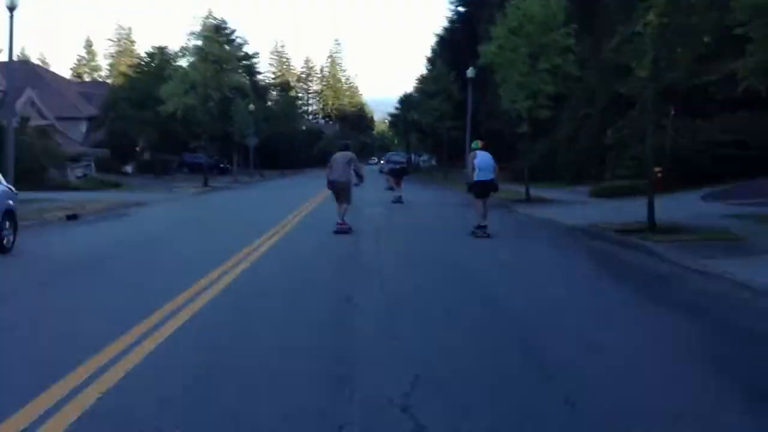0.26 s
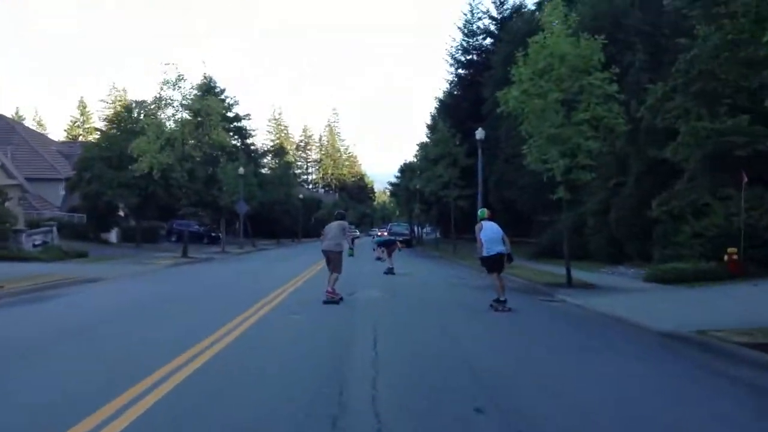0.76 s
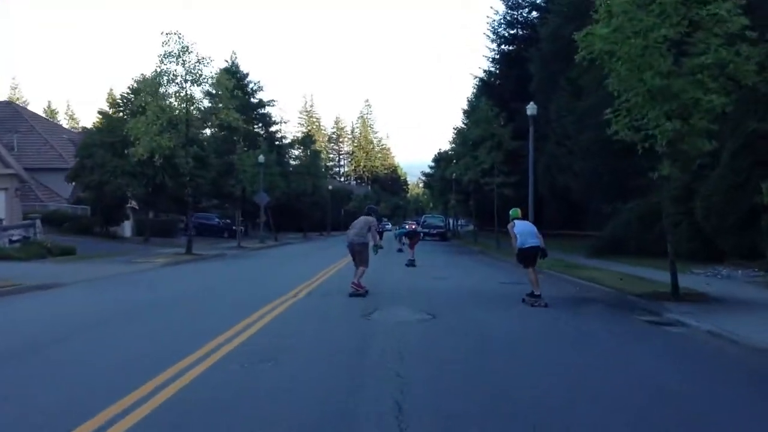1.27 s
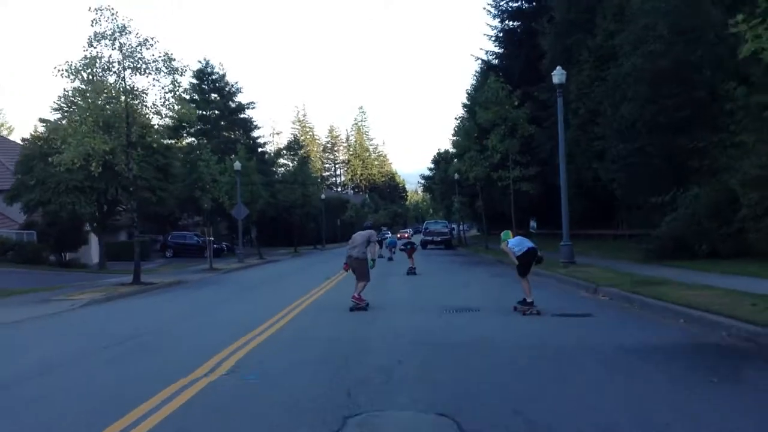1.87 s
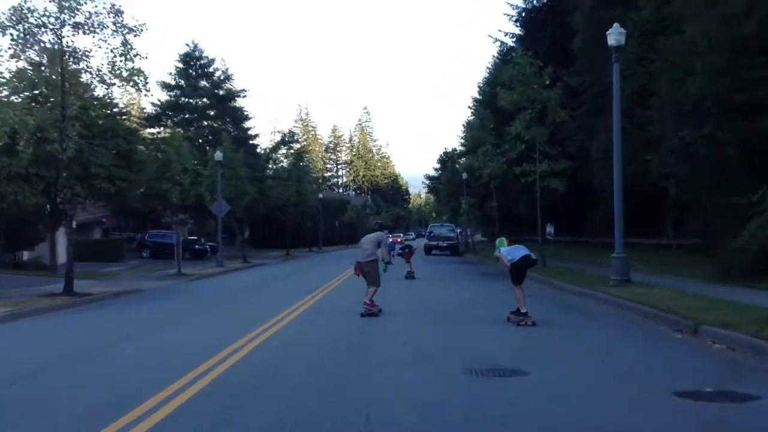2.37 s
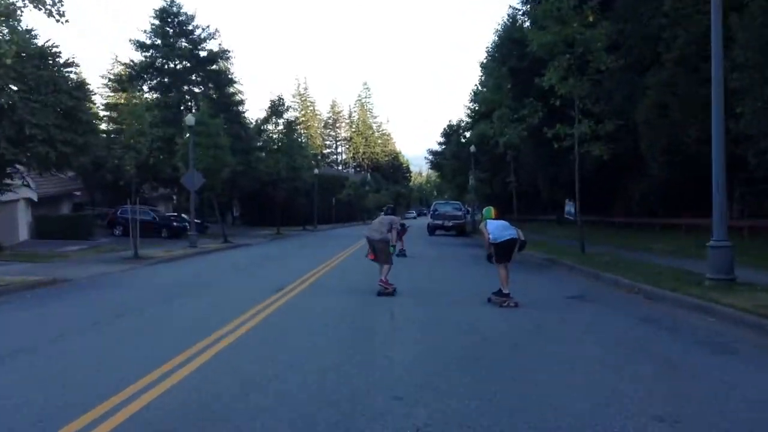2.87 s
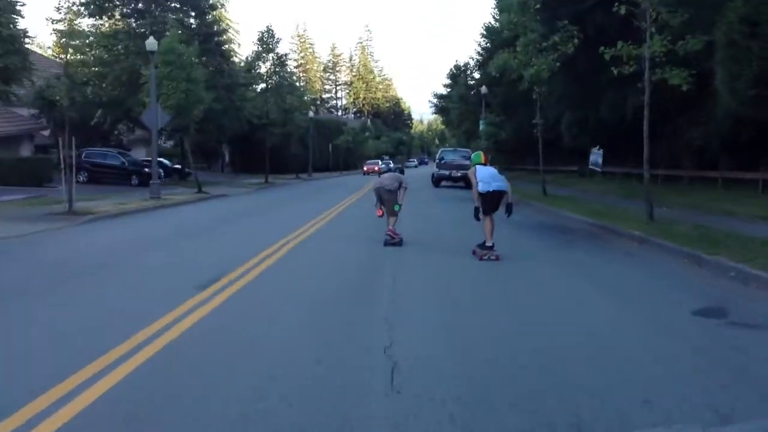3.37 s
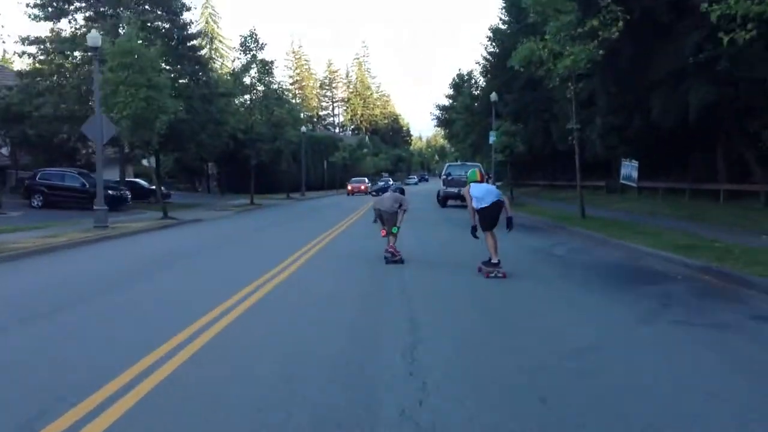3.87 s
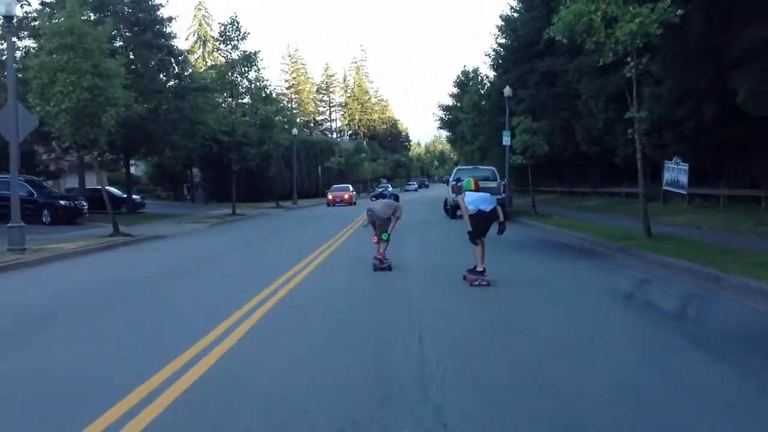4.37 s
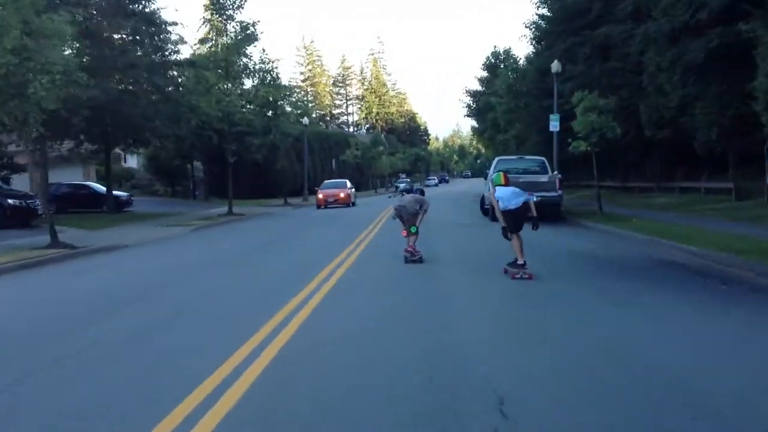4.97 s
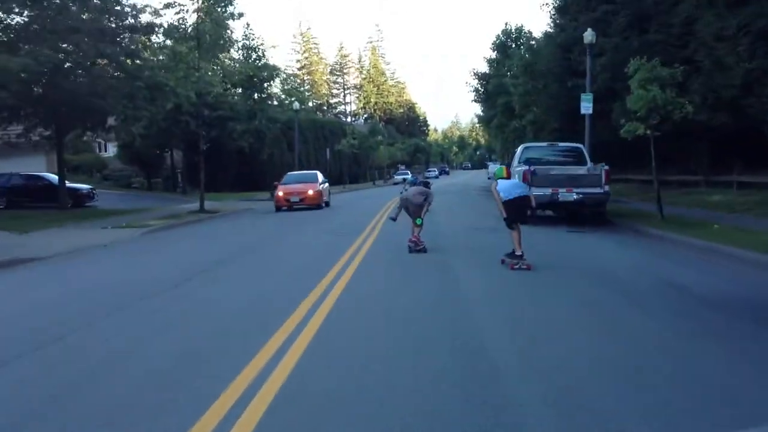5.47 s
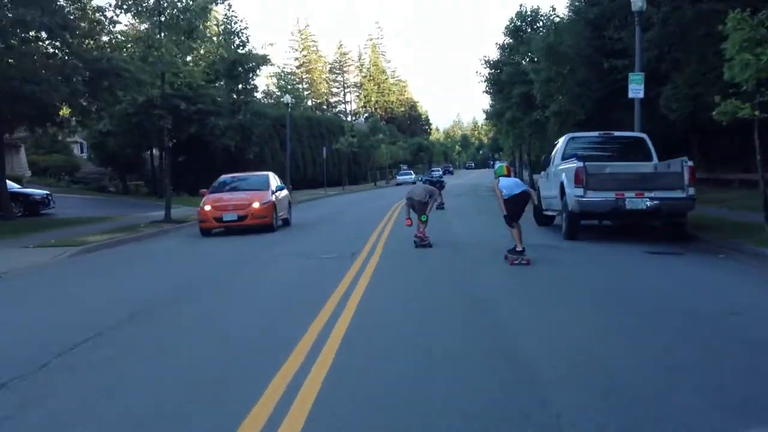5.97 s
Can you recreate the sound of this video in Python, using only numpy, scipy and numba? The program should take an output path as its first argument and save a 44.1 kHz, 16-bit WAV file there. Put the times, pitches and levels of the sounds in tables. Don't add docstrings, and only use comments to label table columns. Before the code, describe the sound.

A moving outdoor microphone is overwhelmed by headwind. Muffled rumbling quickly sharpens into bursts of air and a tiny whistle, followed by a long, hoarse, unstable squeal with overtones. Later the air loosens, chattering and dropping out in tiny lulls, with dull thumps and scattered short squeaks until the end. Smooth urethane wheels add only a thin high hiss, and peaks clip harshly.

```python
import sys
import numpy as np
from scipy import signal
from scipy.fft import rfft, irfft
from scipy.io import wavfile
from scipy.ndimage import uniform_filter1d, minimum_filter1d
from numba import njit

SR = 44100
rng = np.random.default_rng(int(sys.argv[2]) if len(sys.argv) > 2 else 0)


def persist_wave(psi):
    counts = np.round(np.clip(psi, -1, 1) * 32767).astype(np.int16)
    wavfile.write(sys.argv[1], SR, np.atleast_2d(counts).T)


def how_loud(loudness_db):
    steps = np.asarray(loudness_db, float) / 20
    return 10 ** steps


N = 273852

# [t/s, strength/dB, hardness/dB]
SHEAR = [(0.0, -38, -0.5), (0.24, -34, -14.5), (0.69, -24, 0), (0.9, -29.5, -20.5), (0.97, -22.5, -8.5),
         (1.14, -19, -18.5), (1.55, -22.5, -18.5), (1.64, -15, -12.5), (2.63, -17, -12.5),
         (3.11, -22.5, -3), (3.46, -15.5, -11.5), (3.89, -22, -6.5), (4.29, -20, -7), (4.39, -20, -18.5),
         (4.77, -13.5, -17.5), (5.38, -21.5, -16), (5.95, -22, -17.5), (6.21, -20.5, -15)]


def curve(table):
    s, *columns = np.transpose(table)
    return [np.interp(np.arange(N) / SR, s, c) for c in columns]


def unit(x):
    return x / np.sqrt(np.mean(x ** 2))


def walk(rate):
    hold = max(int(SR / rate), 1)
    steps = np.repeat(rng.standard_normal(N // 20), hold)[:N]
    x = uniform_filter1d(uniform_filter1d(steps, hold), hold)
    return unit(x - uniform_filter1d(x, SR // 10))


def bands(shape, lo_hz, hi_hz, gust_db, own_db, rate, tilt_db=0., pivot_hz=2600):
    shape_hz, shape_db = np.transpose(shape)
    f = np.maximum(np.fft.rfftfreq(N, 1 / SR), 1)
    noise = rfft(rng.standard_normal(N)) * how_loud(np.interp(np.log(f), np.log(shape_hz), shape_db))
    out = 0
    for centre in 30 * 2 ** np.arange(0, 9.6, .5):
        part = irfft(noise * np.clip(1 - abs(np.log2(f / centre)) * 2, 0, 1), N)
        octaves_up = max(np.log2(centre / pivot_hz), 0)
        out = out + part * how_loud(gust_db + own_db * walk(rate) + tilt_db * octaves_up)
    inside = (f > lo_hz) & (f < hi_hz)
    return out / np.sqrt(2 * np.sum(abs(noise[inside]) ** 2) / N ** 2)


@njit
def svf(x, hz, k):
    y, b, l = np.empty(len(x)), 0., 0.
    for i in range(len(x)):
        g = np.tan(np.pi * hz[i] / SR)
        v = (b + g * (x[i] - l)) / (1 + g * (g + k))
        b, l, y[i] = 2 * v - b, l + 2 * g * v, k * v
    return y


def envelope(rows, attack_s):
    t, out = np.arange(N) / SR, np.zeros(N)
    for s, height, length in rows:
        start = int(s * SR)
        u = abs(t[start:int((s + .15) * SR)] - s)
        out[start:start + len(u)] += height * (1 - np.exp(-u / attack_s)) * np.exp(-u / max(length, .002))
    return out


def streaks(rows, trim_db):
    t, out = np.arange(N) / SR, np.zeros(N)
    for s, db, length in rows:
        at = slice(int((s - .02) * SR), int((s + .06) * SR))
        wide = np.clip(length, .001, .015)
        out[at] += how_loud(db + trim_db) * np.exp(-((t[at] - s - 0.78 * wide) / wide) ** 2)
    return out


def plateaus(rest, rows, edge_s):
    out = rest + np.zeros(N)
    for s, length, value in rows:
        out[int(s * SR):int((s + length) * SR)] = value
    return uniform_filter1d(out, max(int(edge_s * SR), 1))


def wheels():
    # [f/Hz, level/dB per Hz]
    hiss_colour = [(1000, 5.5), (3000, 18.5), (5000, 10.), (7000, 13.5), (8500, 7.), (10000, 0.5),
                   (12000, 3), (15000, -5.6)]
    # [t/s, level/dB]
    rolling = [(0, -72), (.65, -72), (.8, -77), (3, -79), (4.2, -77), (4.5, -72), (4.8, -75), (5.4, -73),
               (6.21, -74)]
    grit_db = 1.3 * walk(760) + 0.78 * walk(12)
    return bands(hiss_colour, 10000, 13000, grit_db, .8, 8) * how_loud(curve(rolling)[0] + 3.0)


def whistle():
    # [t/s, f/Hz, level/dB]
    turn_in = [
        (.56, 1998, -66),
        (.605, 2100, -40.5),
        (.625, 2190, -23),
        (.64, 1950, -18.5),
        (.657, 2200, -21.5),
        (.68, 2270, -65),
    ]
    hz, db = curve(turn_in)
    noise, t = rng.standard_normal(N), np.arange(N) / SR
    low, high = (unit(svf(svf(noise, k * hz, 0.16), k * hz, 0.3)) for k in (1, 2))
    return how_loud(db) * (low + how_loud(-11.5) * high) * (t > turn_in[0][0]) * (t < turn_in[-1][0])


def rush(gust, flutter):
    # [f/Hz, level/dB per Hz]
    fine_air = [(500, -4), (1000, 10.), (1600, 11), (2500, 2), (3600, -7.5), (5000, -16.), (7000, -27),
                (9000, -43), (16000, -86.5)]
    # [t/s, level/dB, length/s]
    sudden_blows = [(0.308, -23, .02), (0.47, -3, 0.004), (0.48, -13.5, 0.026), (0.601, 0.5, 0.0031),
                    (.627, -10.5, .012), (0.648, -8.5, .01), (0.671, -5, 0.01), (0.697, -7.5, 0.0093),
                    (0.769, -10, 0.008), (0.781, -10.5, 0.0077), (0.822, -17, .006), (0.848, -20, .012),
                    (0.941, -15.5, 0.0076), (1.025, -5.5, 0.015), (1.193, -10, .01), (1.271, -8, 0.015),
                    (1.464, -13.5, 0.0071), (1.584, -11.5, .008), (1.64, -6.5, 0.0088), (1.653, -5, 0.013),
                    (1.686, -8, 0.0087), (1.759, -8, 0.013), (1.901, -8.5, .006), (1.974, -7.5, 0.015),
                    (2.067, -11, 0.013), (2.096, -7, .015), (2.145, -11.5, .008), (2.292, -5.5, 0.021),
                    (2.416, -7.5, 0.0088), (2.676, -9, 0.01), (2.755, -16, .01), (2.808, -1.5, .003)]
    # [t/s, level/dB, length/s]
    chatter = [(2.902, -28.5, 0.004), (2.935, -26.5, 0.004), (2.9474, -22.5, 0.004), (2.964, -20, 0.004),
               (2.974, -24.5, 0.0037), (2.9874, -22, 0.0037), (3.0035, -24.5, 0.0037), (3.0164, -27, 0.004),
               (3.031, -19.5, 0.004), (3.0405, -22.5, 0.004), (3.073, -22.5, 0.004), (3.095, -18, 0.0049),
               (3.113, -20.5, 0.0044), (3.1346, -20, 0.004), (3.1467, -16, 0.004), (3.1525, -18.5, 0.0044),
               (3.1746, -25, 0.004), (3.1872, -23.5, 0.004), (3.2046, -24, 0.0044), (3.215, -22.5, 0.004),
               (3.228, -28.5, 0.004), (3.2587, -25, 0.0036), (3.29, -19, 0.004), (3.319, -23, 0.0036),
               (3.3357, -23, 0.004), (3.3635, -27, 0.004), (3.4, -24.5, 0.0035), (3.457, -29, 0.0033),
               (3.469, -25.5, 0.0031), (3.5006, -23.5, 0.0044), (3.56, -28.5, 0.004),
               (3.6116, -17.5, 0.004), (3.637, -31, 0.004), (3.689, -31.5, 0.004), (3.7247, -27, 0.004),
               (3.734, -24.5, 0.0037), (3.7764, -21, 0.004), (3.7994, -25.5, 0.004),
               (3.8397, -21.5, 0.0044), (3.883, -31, 0.004), (3.8954, -28, 0.004), (3.9063, -21, 0.004),
               (3.9356, -32.5, 0.004), (3.964, -33.5, 0.004), (3.979, -24.5, 0.004), (4.0094, -25.5, 0.004),
               (4.0174, -26, 0.004), (4.076, -27.5, 0.004), (4.1004, -30.5, 0.004), (4.142, -22, 0.004),
               (4.185, -30, 0.004), (4.2098, -23.5, 0.0034), (4.232, -24, 0.004), (4.252, -17.5, 0.004),
               (4.2657, -20.5, 0.004), (4.2885, -22, 0.004)]
    # [t/s, level/dB, length/s]
    thin_streaks = [(4.46, -29.5, 0.004), (4.4867, -23.5, 0.0036), (4.527, -20.5, 0.0049),
                    (4.557, -24.5, 0.004), (4.565, -25, 0.004), (4.58, -25.5, 0.004), (4.609, -29, 0.004),
                    (4.64, -31.5, 0.004), (4.641, -23.5, 0.004), (4.667, -23.5, 0.004),
                    (4.7007, -21.5, 0.0036), (4.721, -28.5, 0.0036), (4.765, -26, 0.004),
                    (4.8174, -21, 0.004), (4.898, -23, 0.004), (4.929, -22, 0.004), (5.002, -29.5, 0.004),
                    (5.0444, -22.5, 0.0048), (5.061, -22.5, 0.004), (5.091, -22.5, 0.0045),
                    (5.1163, -26, 0.004), (5.137, -23.5, 0.0036), (5.1635, -28.5, 0.004),
                    (5.289, -19.5, 0.0051), (5.359, -32.5, 0.004), (5.5433, -29.5, 0.004),
                    (5.558, -28.5, 0.004), (5.639, -27, 0.004), (5.693, -23, 0.004), (5.895, -21.5, 0.0045),
                    (5.9396, -28.5, 0.004), (5.9905, -20, 0.004), (6.0657, -19.5, 0.004),
                    (6.138, -28.5, 0.004), (6.1737, -16, 0.004), (6.19, -22, 0.0049)]
    blow_flutter = .4

    shear_db, hard_db = curve(SHEAR)
    db = shear_db + hard_db + 2.2 * walk(20) + 2.5
    bright_db = 0.43 * (hard_db + 15.4)
    blows = envelope([(s, how_loud(peak - 14.0), length) for s, peak, length in sudden_blows], attack_s=0.0022)
    blows += streaks(chatter, trim_db=-5.0) + streaks(thin_streaks, trim_db=-8.5)
    rattle_db = plateaus(0, [(2.5, .42, 0.5)], .05) * np.tanh(walk(83)) * 1.3
    streaky_db = 1.6 * gust + 3.3 * flutter
    size = np.hypot(how_loud(db - 10.0 + rattle_db), blows * how_loud(1.5 - (1 - blow_flutter) * streaky_db))
    tilt_db = bright_db + 2.1 * np.log(size / 0.1) + 0.31 * gust
    return bands(fine_air, 1706, 5701, streaky_db, 0.4, 60, tilt_db) * size


def buffet(gust):
    # [f/Hz, level/dB per Hz]
    eddies = [(40, -46), (80, -13.5), (150, 2.5), (220, 5.5), (350, 3), (550, -1), (1000, -10),
              (2000, -22.5), (8000, -85.5)]
    # [t/s, force/dB]
    headwind = [(0.0, -19), (0.59, -20.5), (0.95, -23), (1.47, -20), (2.35, -23), (2.97, -18.5),
                (3.35, -20), (4.29, -21), (4.65, -19), (5.14, -20.5), (5.48, -18.5), (6.21, -21.5)]
    # [t/s, length/s, level/dB]
    thumps = [(0.018, 0.052, -8.5), (0.247, 0.017, -16), (0.314, .03, -15), (0.411, 0.019, -14),
              (0.45, 0.12, -15), (0.594, 0.038, -13.5), (0.653, 0.056, -13.5), (0.755, 0.031, -13),
              (0.8, 0.035, -16), (0.933, 0.045, -19), (0.996, 0.043, -10.5), (1.155, 0.045, -14.5),
              (1.468, 0.023, -14.5), (2.756, 0.027, -19), (2.799, 0.035, -13.5), (2.983, .014, -14),
              (3.045, 0.018, -12.5), (3.135, 0.022, -12.5), (3.297, 0.023, -14.5), (3.4, 0.013, -16),
              (3.461, 0.015, -14), (3.58, 0.034, -15.5), (3.742, .01, -18), (3.899, .012, -12),
              (3.938, .01, -12), (3.987, 0.036, -12), (4.054, 0.033, -15), (4.462, 0.026, -14),
              (4.557, 0.085, -17), (5.052, 0.025, -14), (5.298, 0.037, -19), (5.404, 0.048, -13),
              (5.543, 0.028, -15.5), (5.654, 0.023, -18.5), (5.865, 0.02, -13), (5.98, 0.01, -11)]
    # [t/s, length/s, level/dB]
    calms = [(0, 0.04, -17), (0.07, .06, -23.5), (0.196, 0.042, -22), (0.834, 0.049, -24.5),
             (5.102, 0.092, -22), (5.802, 0.042, -32.5), (6.051, 0.11, -24.5)]
    db = plateaus(curve(headwind)[0], thumps + calms, edge_s=0.009)
    tilt_db = 0.33 * (curve(SHEAR)[0] + 20)
    lumps = bands(eddies, 90, 486, 0.24 * gust + 2.28 * walk(85), 2.1, 55, tilt_db, pivot_hz=300)
    return lumps * how_loud(db + 1.36 * walk(14) - 0.22)


def locks():
    # [t/s, length/s, level/dB, first f/Hz, last f/Hz]
    slide = [(.48, .035, -21, 640, 630), (0.688, 0.0298, -9.5, 960.1, 880), (.72, 0.02807, -18, 870.4, 850),
             (0.854, 0.018, -19, 727.6, 718.6), (0.943, .108, -13, 650, 725),
             (1.05, 0.081, -14, 719, 681.7), (1.139, .045, -12.5, 663, 721.4),
             (1.193, .067, -14.5, 730, 791), (1.259, .16, -13, 789, 760), (1.425, 0.04, -12, 755.7, 752),
             (1.47, 0.05, -14.5, 742, 700), (1.558, .075, -8, 697.3, 830), (1.637, .022, -11, 939, 860),
             (1.666, .018, -13.5, 950, 1000), (1.69, 0.048, -9.5, 848, 940),
             (1.754, 0.024, -14, 1000, 857.5), (1.781, .03, -9, 826.3, 792),
             (1.815, 0.097, -13.5, 868.6, 899.4), (1.92, .035, -16.5, 798.4, 880),
             (1.975, .045, -9.5, 935, 835), (2.022, .035, -17, 835, 859.4), (2.068, 0.034, -10, 920, 965),
             (2.106, .04, -13.5, 860, 930.5), (2.153, 0.075, -19, 802.4, 777.5),
             (2.236, 0.04, -11.5, 768, 744), (2.283, 0.058, -13, 960.1, 829.5),
             (2.346, .052, -13.5, 828.5, 880), (2.418, 0.085, -11, 940.6, 753.4),
             (2.505, 0.03, -9, 770, 864.3), (2.541, .048, -8.5, 759.7, 898.5),
             (2.594, 0.055, -11, 858.7, 736), (2.658, 0.035, -17.5, 803.6, 913),
             (2.745, .04, -9.5, 730, 662), (2.792, .036, -7.5, 760, 675.7),
             (2.836, .035, -11, 768.4, 854.7), (2.873, .018, -14.5, 797.6, 699)]
    # [t/s, length/s, level/dB, f/Hz, steadiness
    catches = [(.08, .37, -38, 700, 0.04), (3.031, 0.03007, -10, 736, 0), (3.131, 0.03464, -15, 860, 0.1),
               (3.448, 0.0393, -14, 651, 0.2), (3.524, 0.0533, -17.5, 703.3, 0.02),
               (3.899, .02, -17, 670, 0.1), (3.996, 0.0316, -16.5, 745, 0), (4.08, 0.083, -24, 849, 0.72),
               (4.248, .025, -19, 800, 0.1), (4.42, 0.03046, -18, 608.1, 0.9), (4.513, 0.04, -13, 720, 0.6),
               (4.598, 0.0592, -18, 789.4, 0.7), (4.694, 0.04, -17.5, 740, 0.5),
               (4.768, .025, -19, 679.5, .3), (4.87, 0.0303, -19, 761, 0.14),
               (5.552, .033, -13.5, 740, 0.7), (5.693, .03, -12, 747, 0.6)]
    # [t/s, length/s, level/dB, first f/Hz, last f/Hz]
    arcs = [(2.928, .03, -21.5, 1050, 1100), (2.959, .022, -21.5, 1080, 1100),
            (3.005, .018, -18, 1120, 1150), (4.31, .09, -20, 900, 820), (4.826, .04, -16.5, 539.8, 611),
            (4.915, .045, -16, 890, 800), (4.996, .065, -18, 740, 900), (5.199, .04, -24, 800, 830),
            (5.785, .065, -21, 770, 870), (5.894, .05, -18, 890, 780), (6.054, .045, -15.5, 790, 710),
            (6.102, .025, -21, 740, 840), (6.131, .025, -15.5, 800, 760)]
    loose_steady, slide_steady, arc_steady = 0.11, .78, .85
    edge_s, glide_s = .006, .008

    rows = [r + (slide_steady,) for r in slide] + [r + (arc_steady,) for r in arcs]
    rows += [(s, length, db, hz, hz, steady) for s, length, db, hz, steady in catches]
    db = plateaus(curve(SHEAR)[0] - 3, [r[:3] for r in rows], edge_s)
    steady = plateaus(loose_steady, [(r[0], r[1], r[5]) for r in rows], edge_s)
    starts = [(r[0], r[3]) for r in rows]
    ends = [(r[0] + r[1], r[4]) for r in rows]
    hz = curve(sorted(starts + ends))[0]
    return db, uniform_filter1d(hz, int(glide_s * SR)), steady


def squeal(gust, flutter):
    # [multiple, level/dB]
    overtones = [(1, 0), (2, -9), (3, -19), (4, -30)]
    # [t/s, extra level/dB per overtone]
    rounding = [(0, 1.5), (.9, 0.5), (1, 0.5), (2.6, 0.5), (3, -2), (4, -6.5), (4.4, -4.5), (6.21, -2.5)]
    firm_lock = .1
    port_hz = 4960

    db, hz, steady = locks()
    steady = np.clip(steady, 0, 1)
    waver = np.clip((1 - steady) / firm_lock, .25, 1)
    gains = [(k, how_loud(g + (k - 1.5) * curve(rounding)[0])) for k, g in overtones]
    hz = hz * (1 + waver * (.02 * gust + .025 * walk(70)))
    phase = 2 * np.pi * np.cumsum(hz * (1 + .037 * waver * walk(260))) / SR
    locked = sum(g * how_loud(2.5 * waver * walk(120)) * np.cos(k * phase - .7 * k) for k, g in gains)
    locked = unit(locked * how_loud(2.4 * waver * walk(190)))
    noise = rng.standard_normal(N)
    loose = sum(g * unit(svf(svf(noise, k * hz, 0.5 / k), k * hz, 0.5 / k)) for k, g in gains)
    tone = np.sqrt(steady) * locked + np.sqrt(1 - steady) * loose * how_loud(3.47 * flutter - 2.0)
    dull = signal.butter(2, port_hz, fs=SR, output="sos")
    return signal.sosfilt(dull, tone * how_loud(db + 0.31 * gust + 0.1))


def lulls_db():
    # [t/s of the snap back, depth/dB, length/s]
    lulls = [(0.852, 4.5, 0.016), (0.938, -2, 0.027), (1.194, -0.5, 0.0075), (1.47, 4.5, 0.01),
             (1.414, 4, 0.0072), (1.552, 1.5, 0.04), (1.748, 5, 0.015), (1.976, 2.5, 0.01),
             (2.414, 5, 0.01), (2.745, 2.5, 0.013), (2.926, 10, .012), (3, 12, 0.0086), (3.028, 8.5, 0.013),
             (3.066, 5.5, .012), (3.125, 5, 0.016), (3.184, 14, 0.007), (3.2, 12, 0.008),
             (3.253, 15.5, 0.018), (3.29, 2, 0.0063), (3.651, 12.5, 0.02), (3.725, 8.5, 0.035),
             (3.876, 13.5, 0.013), (3.937, 7, 0.0093), (3.96, 19, 0.014), (3.974, 21, 0.0067),
             (3.995, 7, 0.014), (4.047, 9.5, 0.032), (4.193, 14.5, 0.0076), (4.247, 4.5, 0.0092),
             (4.418, 5, 0.011), (4.692, 5.5, 0.0086), (4.767, 5.5, 0.023), (4.991, 11.5, 0.012),
             (5.112, 10, 0.0097), (5.157, 12, 0.01), (5.279, 14.5, 0.039), (5.425, 9, 0.016),
             (5.521, 12, 0.019), (5.549, 8, 0.012)]
    snap_back_s = .0032
    t, dips = np.arange(N) / SR, np.zeros(N)
    for s, depth, length in lulls:
        dips += depth * np.exp(-((t - s) / np.where(t < s, length, snap_back_s)) ** 4)
    return -dips


def scene():
    gust = walk(36)
    flutter = 1.3 * np.tanh(walk(170))
    wind = (squeal(gust, flutter) + buffet(gust) + rush(gust, flutter)) * how_loud(lulls_db())
    return (wind + whistle() + wheels())[None]


def roll_off(x):
    return signal.sosfilt(signal.butter(12, 15350, fs=SR, output="sos"), x)


def record(dry):
    mic_low_hz, limit_at, limit_s, clip_at = 48, 0.62, 0.008, .71
    dry = signal.sosfilt(signal.butter(2, mic_low_hz, "high", fs=SR, output="sos"), dry)
    span = int(limit_s * SR)
    swell = uniform_filter1d(-minimum_filter1d(-abs(dry), span), span)
    x = dry * np.minimum(limit_at / swell, 1) ** 0.8
    return roll_off(np.clip(x, -clip_at, clip_at))


dry = scene()
out = record(dry)
persist_wave(out)
```